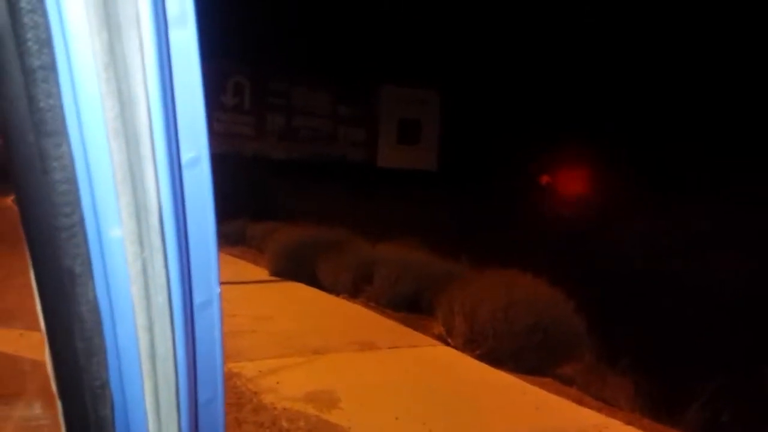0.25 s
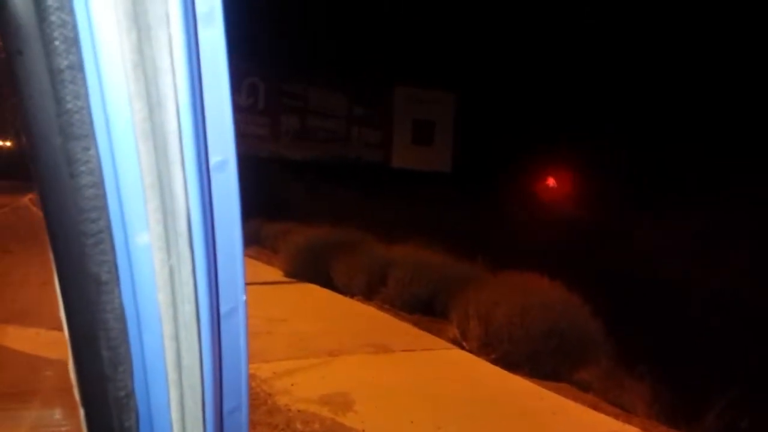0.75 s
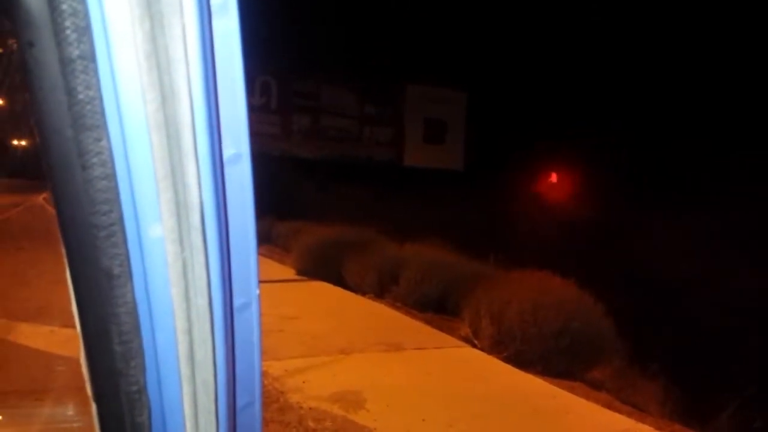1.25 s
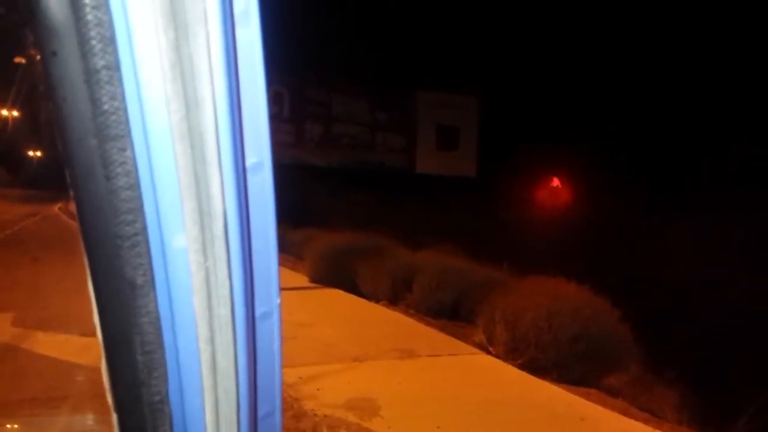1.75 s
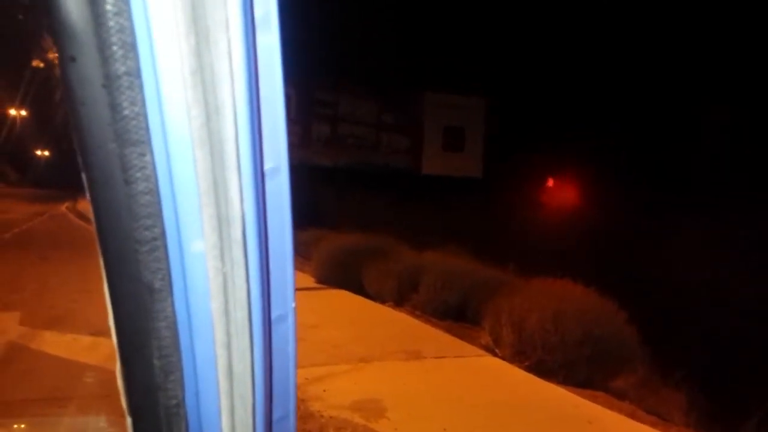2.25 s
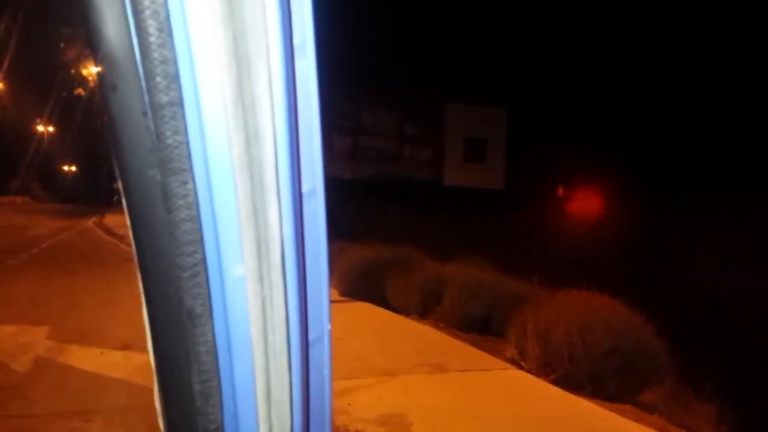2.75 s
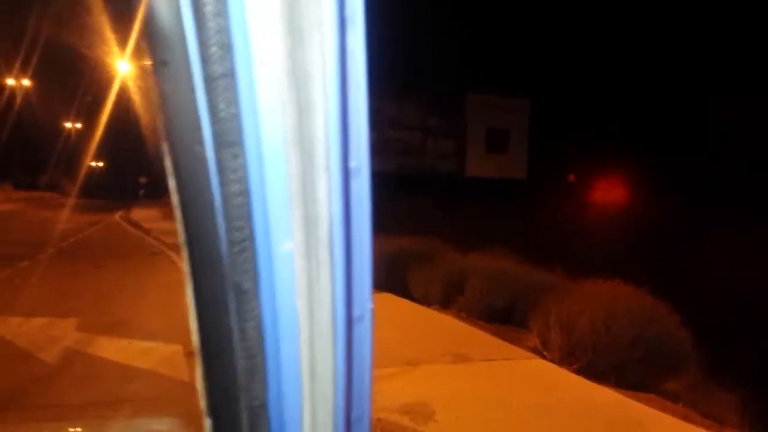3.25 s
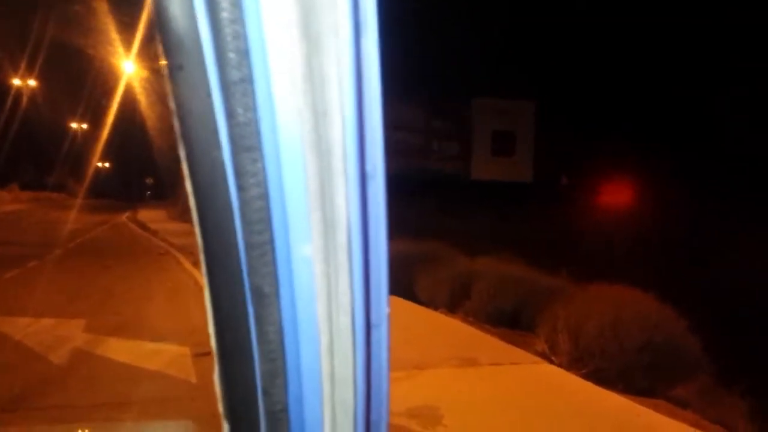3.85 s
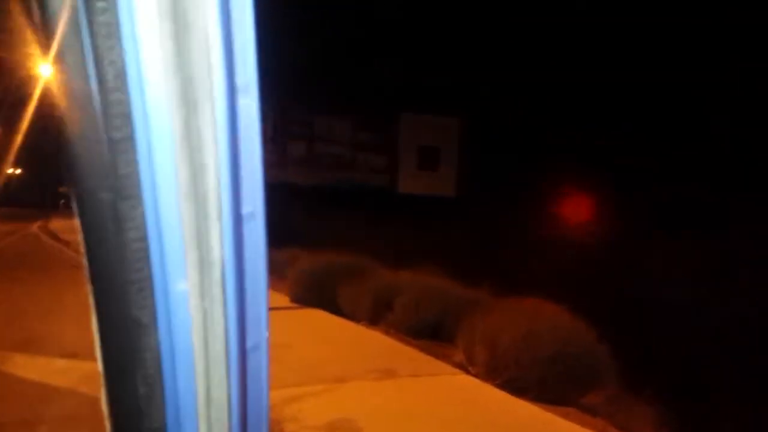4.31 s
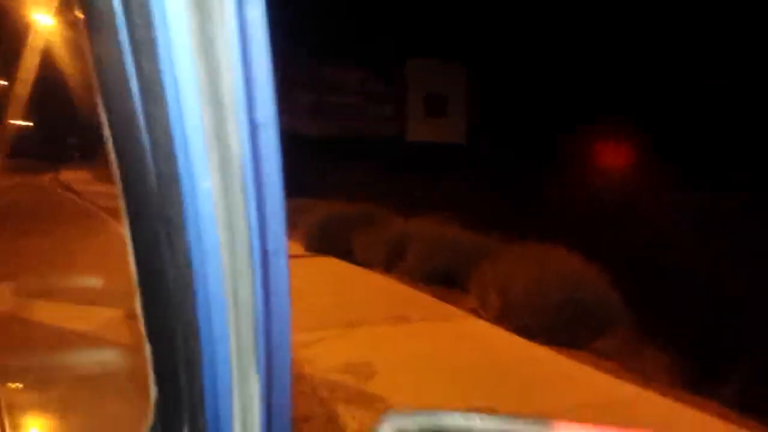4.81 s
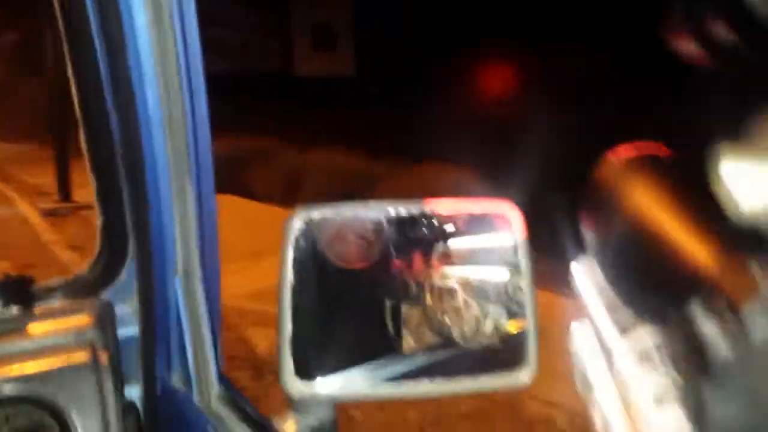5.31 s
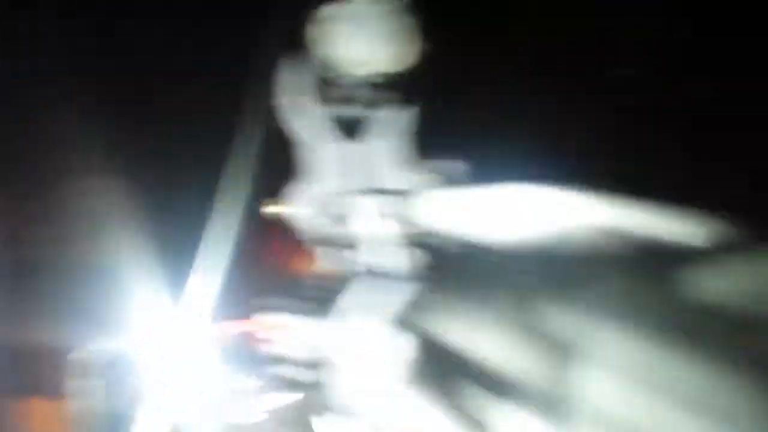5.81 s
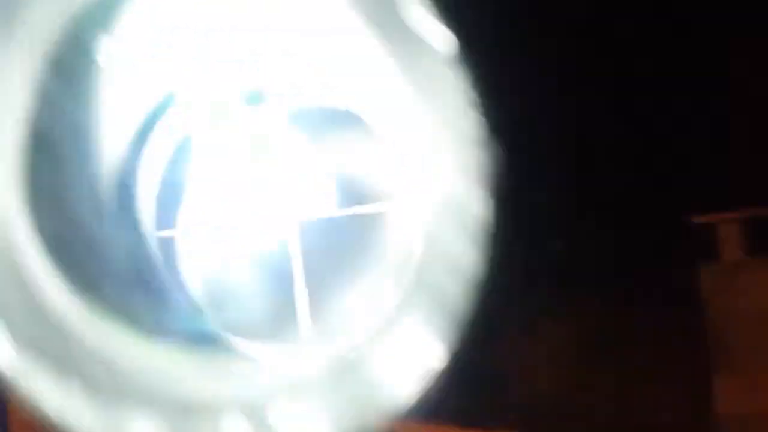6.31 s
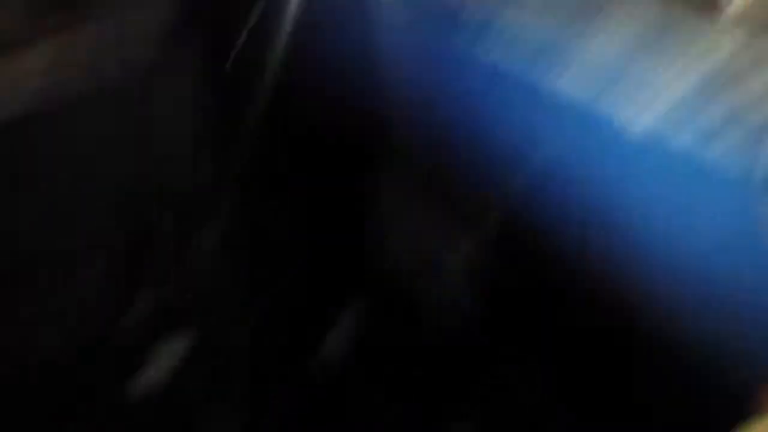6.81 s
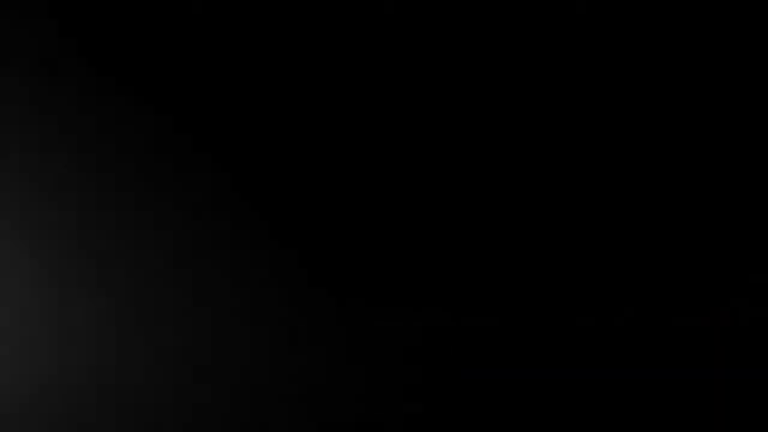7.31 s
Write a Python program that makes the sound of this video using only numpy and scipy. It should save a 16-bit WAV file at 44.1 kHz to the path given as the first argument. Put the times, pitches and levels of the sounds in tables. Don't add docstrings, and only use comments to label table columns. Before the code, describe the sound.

A turn-signal relay ticks steadily, click and clack, inside a quiet parked vehicle, with faint engine drone, handling rustle and sharp plastic snaps at the end.

```python
import sys
import numpy as np
from scipy import signal
from scipy.fft import rfft, irfft
from scipy.io import wavfile
from scipy.ndimage import uniform_filter1d

SR = 44100
rng = np.random.default_rng(int(sys.argv[2]) if len(sys.argv) > 2 else 0)


def to_wav(s):
    ch = np.atleast_2d(s).T
    pcm = np.round(np.clip(ch, -1, 1) * 32767)
    wavfile.write(sys.argv[1], SR, pcm.astype(np.int16))


def linear_from_db(decibels):
    return 10 ** (np.asarray(decibels, float) / 20)


N = 333345

# frequency in Hz, density in dB per Hz.
HISS_COLOUR = [(880, -52), (1500, -7), (2200, -12), (5240, -4), (6190, -4.5), (7380, -5.5), (13900, -7.5),
               (14800, -14), (15500, -37)]

# time in seconds, pitch in Hz.
ENGINE_PITCH = [(0.0, 103.9), (0.7, 106), (1.25, 114), (2.6, 125.5), (3.75, 132.8), (4.1, 138.7),
                (4.5, 139.8), (4.7, 131.3), (4.92, 149.6)]
# start in seconds,
# length in seconds, level in dB rms.
DRONE_SWELLS = [(.2, 0.18, -75), (.53, 0.13, -60.5), (.74, .58, -65.5), (1.5, 0.24, -67),
                (2.11, .35, -69.5), (2.5, 0.36, -66.5), (3.11, 0.21, -64.5), (3.36, 0.47, -59.5),
                (3.86, 0.24, -65), (4.07, 0.13, -55), (4.18, 0.15, -48.5), (4.33, 0.29, -54.5),
                (4.51, 0.12, -38), (4.79, 0.11, -56), (4.9, .12, -54)]
# time in seconds, pitch in Hz, level in dB rms.
WHINE = [(1.2, 262, -81), (1.4, 267.7, -75), (2.0, 277.6, -83.5), (2.4, 284, -74), (2.8, 288.2, -76.5),
         (3.0, 292.5, -92)]

# time in seconds, rub level in dB.
GRIP = [(0, -82), (.16, -73.5), (.3, -79.5), (.61, -69.5), (.8, -78), (1.58, -71.5), (1.9, -80),
        (3.15, -78.5), (3.9, -74), (4.25, -67), (4.58, -64.5), (4.72, -78.5), (5.55, -65.5), (5.95, -71.5),
        (6.15, -73), (6.92, -52), (7.2, -69), (7.56, -76)]
# start in seconds, length in seconds, level in dB rms.
JOLTS = [
    (.55, 0.24, -65),
    (4.05, 0.13, -60),
    (4.5, 0.18, -46.5),
    (4.72, 0.19, -59.5),
    (5.04, 0.092, -57),
    (5.72, 0.055, -49),
    (5.85, 0.11, -59),
    (7.03, 0.098, -58),
]
# start in seconds, length in seconds, level in dB rms, left minus right in dB.
STROKES = [(0.025, 0.45, -78, 10), (0.475, 0.25, -68.5, 4.5), (0.986, 0.39, -69, 7), (1.234, 0.49, -71, 7),
           (3.203, 0.29, -78, 3), (3.91, .08, -56.5, 3), (4.053, 0.658, -67.5, 3.5),
           (4.701, 0.49, -73, 0.5), (5.091, .48, -67.5, 9), (5.56, 0.53, -69, 5.5), (6.17, 0.34, -59, 1.5),
           (6.383, 0.72, -53, 3.5), (7.043, 0.17, -63, 7), (7.187, 0.34, -66, 16), (7.277, 0.17, -51, 2),
           (7.39, 0.21, -51, 2)]
# frequency in Hz, density in dB per Hz.
RUMBLE_COLOUR = [(15, -6), (40, 0), (70, 4), (110, 4.5), (160, 2.5), (250, -70)]
CREAK_COLOUR = [(70, -16), (110, 3.5), (220, 1.5), (340, -5), (520, -7.5), (800, -35)]
RUB_COLOUR = [(300, -1.5), (550, 0), (850, 1.5), (1350, -1.5), (1900, -6), (2600, -7), (3600, -15.5)]
RUSTLE_COLOUR = [(1180, -38), (2000, -10.5), (2470, -9), (3430, -4.5), (3860, -4), (6350, 2), (7390, -2),
                 (8170, -1.5), (9360, -7.5), (11500, -11), (13100, -13), (14300, -24), (15000, -25)]

# start in seconds, length in seconds, centre in Hz, width in Hz, level in dB rms.
SQUEAKS = [
    (2.25, 0.99, 1440, 200, -80.5),
    (0.092, 0.34, 1380, 200, -76),
    (4.218, 0.22, 1460, 140, -65),
    (4.193, 0.12, 4700, 270, -64),
    (4.764, 0.24, 284, 140, -57.5),
    (6.5, 0.82, 2550, 450, -62.5),
    (6.751, 0.45, 1440, 160, -58),
    (6.802, 0.54, 840, 150, -60.5),
    (7.117, 0.06, 810, 100, -61),
]
# start in seconds, peak in dB, centre in Hz, decay to -60 dB in seconds,
# dry tick in dB relative to the peak.
BUMPS = [(0.073, -53, 2020, 0.14, 0), (0.18, -58, 1380, .03, 4.5), (0.259, -58, 315, 0.22, 6.5),
         (0.589, -49, 136, 1, -25), (.66, -55, 122, 0.16, -25), (0.87, -53.5, 145, 0.13, -8),
         (1.28, -63.5, 300, 0.065, 16.5), (1.53, -54, 120, 0.22, -30), (1.69, -53, 676, 0.073, -11),
         (3.24, -61.5, 696, 0.16, 2), (3.387, -50, 630, 0.17, -8), (3.79, -54.5, 395, 0.12, -7),
         (3.933, -56.5, 500, 0.2, 10), (4.058, -49.5, 214, 0.12, -8), (4.186, -49, 785, 0.27, 10),
         (4.438, -52, 900, .08, 10), (4.508, -38, 186, 0.39, -26), (4.59, -46.5, 151, 0.35, -34),
         (4.773, -54.5, 285, 0.11, -21), (5.466, -54.5, 141, .2, 12), (5.569, -39, 198, 0.12, -13),
         (5.813, -51, 7000, 0.0078, 2), (7.025, -40, 4000, 0.0096, -5)]

SNAP_TIMES = [7.0328, 7.0355, 7.0599, 7.1983, 7.3283, 7.3330, 7.3345]
# left level in dB, right level in dB, the snap's own mode in Hz, blunt push in dB, decay
# to -60 dB in seconds.
SNAPS = [
    (-11.5, -19.5, 3980, -43, 0.0032),
    (-33, -27, 3600, -40, 0.011),
    (4.5, -8.5, 2290, -26, 0.0032),
    (-0.5, -32, 1330, -64, 0.0027),
    (-23.5, -21, 2400, -24, 0.001),
    (-31, -23.5, 5100, -14, 0.002),
    (-47, -17.5, 4300, -33, 0.0055),
]
# frequency in Hz, level in dB.
SNAP_MODES = [(3800, 0), (5300, 0.5), (6450, 3.5), (7600, 0), (8500, -3), (11000, -7.5), (12500, -8),
              (14200, -11.5)]

# peak in dB, left minus right in dB.
MAKE_CLICKS = [(-28, 1), (-26, 4), (-28, 3.5), (-25, 2), (-26.5, 4), (-24, 3), (-23, 2.5), (-24.5, 4),
               (-28, 1.5), (-18.5, -0.5), (-32.5, 4)]
BREAK_CLICKS = [(-32.5, 2.3), (-29.5, 5.5), (-30, 2.4), (-31.5, 3.5), (-31, 2.5), (-28, 3.5), (-26, 2.3),
                (-30, 2.2), (-29, 0.98), (-27.5, 2), (-39, 4.8)]
# frequency in Hz, level in dB, decay to -60 dB in seconds.
MAKE_MODES = [(1614, -14, 0.18), (2000, -29, 0.14), (2176, -9.5, 0.1), (2990, -10, 0.28),
              (2976, -7.5, 0.11), (3826, 5, 0.13), (3970, -43, 0.082), (4500, 7, 0.13), (5400, -8, 0.053),
              (5790, -6, 0.028), (6660, -9, 0.09), (7240, -20, 0.045), (8100, -27, 0.05), (8440, 7, 0.036)]
BREAK_MODES = [(1345, -19, 0.29), (2186, -13.5, 0.18), (3100, 3, 0.14), (3940, -32, 0.11),
               (4300, -8.5, 0.26), (5600, -20, 0.1), (5300, -13, 0.091), (6450, -20, 0.12), (7000, 6, 0.1),
               (7740, -29, 0.022), (7500, -3, 0.066), (7900, -1, 0.14)]
# frequency in Hz, density in dB per Hz.
MAKE_SCATTER = [(530, -20), (900, -32.5), (1860, -10), (2280, -25.5), (2860, -2.5), (3380, -11), (4490, -5),
                (5120, -7.5), (8750, -9.5), (11900, -21), (13800, -15.5), (14600, -17.5), (15500, -63)]
BREAK_SCATTER = [(530, -18.5), (900, -20), (1370, -10.5), (2150, -8), (3000, -9), (3630, -14), (4440, -7),
                 (4820, -7), (6730, -2.5), (8550, -15), (13900, -19), (14600, -25), (15500, -77)]
# frequency in Hz, level in dB, decay to -60 dB in seconds.
DASH_MODES = [(212.2, -6.5, 0.39), (278.6, -17, 0.48), (357.7, 1.5, 0.13), (477, -2, 0.18),
              (566.4, -3.5, 0.15)]


def track(table, column):
    rows = np.array(table, float)
    return np.interp(np.arange(N) / SR, rows[:, 0], rows[:, column])


def on_log(points, hz):
    points = np.array(points, float)
    return np.interp(np.log(hz + 1), np.log(points[:, 0]), points[:, 1])


def colour(x, points):
    size = x.shape[-1]
    gain = linear_from_db(on_log(points, np.fft.rfftfreq(size, 1 / SR)))
    y = irfft(rfft(x) * gain, size)
    return y / np.sqrt(np.mean(y ** 2, axis=-1, keepdims=True))


def alike(share, size):
    a, b = rng.standard_normal((2, size))
    share = np.clip(share, 0, 1)
    return np.array([a, np.sqrt(share) * a + np.sqrt(1 - share) * b])


def flicker(rate_hz, depth_db):
    hold = int(SR / rate_hz)
    steps = np.repeat(rng.standard_normal(N // hold + 1), hold)
    return linear_from_db(depth_db * uniform_filter1d(steps, hold)[:N])


def swells(rows, edge_s, rest_db):
    t = np.arange(N) / SR
    power = linear_from_db(rest_db) ** 2
    for s, length, db in rows:
        edge = np.clip(np.minimum(t - s, s + length - t) / edge_s, 0, 1)
        power = power + (linear_from_db(db) * np.sin(np.pi / 2 * edge) ** 2) ** 2
    return np.sqrt(power)


def ring(modes, size, scatter_db, turn, detune=0.):
    t = np.arange(size) / SR
    hz, db, t60 = np.transpose(sorted(modes))[:, :, None]
    chance = rng.standard_normal((3, 2, len(modes), 1))
    sign = (-1.) ** np.arange(len(modes))[:, None]
    phase = 2 * np.pi * hz * (1 + detune * chance[2]) * t + turn * chance[1]
    decay = linear_from_db(db + scatter_db * chance[0] - 60 * t / t60)
    return np.sum(sign * decay * np.sin(phase), axis=1)


def add(out, s, sound):
    i = max(int(s * SR), 0)
    out[:, i:i + sound.shape[1]] += sound[:, :N - i]


def peak1(x):
    return x / np.abs(x).max(axis=-1, keepdims=True)


def ports(x):
    left_minus_right_db = 0.55
    return x * linear_from_db([[left_minus_right_db / 2], [-left_minus_right_db / 2]])


def hiss():
    return linear_from_db(-76) * colour(alike(0.011, N), HISS_COLOUR)


def engine_tone(pitch, gain, end_s):
    fade = np.clip((end_s - np.arange(N) / SR) / 0.037, 0, 1)
    hz = track(pitch, 1) * flicker(30, 0.16)
    return fade * gain * linear_from_db(2.0) * flicker(28, 2.1) * np.sin(2 * np.pi * np.cumsum(hz) / SR)


def engine():
    drone = engine_tone(ENGINE_PITCH, swells(DRONE_SWELLS, edge_s=0.048, rest_db=-73), end_s=5.0)
    whine = engine_tone(WHINE, linear_from_db(track(WHINE, 2)), end_s=WHINE[-1][0])
    return ports(np.array([drone + whine, drone + whine]))


def sleeve():
    grains = alike(0.045, N) * linear_from_db(3.2 * np.minimum(rng.exponential(size=N), 6))
    edge_s, rest_db, rest_pan_db = 0.11, -84, -8
    gains = []
    for side in (1, -1):
        rows = [(s, length, db + side * pan_db / 2) for s, length, db, pan_db in STROKES]
        gains.append(swells(rows, edge_s, rest_db + side * rest_pan_db / 2))
    return linear_from_db(2.5) * np.array(gains) * flicker(18, 1.1) * colour(grains, RUSTLE_COLOUR)


def hand():
    grip_db = track(GRIP, 1)
    effort_db = np.minimum(grip_db, -67) + 72
    rumble_db = -73.5 + 0.38 * effort_db
    creak_db = -70 + effort_db
    rumble = swells(JOLTS, 0.085, rumble_db) * flicker(9.2, 2.1) * colour(alike(0.54, N), RUMBLE_COLOUR)
    creak = linear_from_db(creak_db + 3) * flicker(22, 3.6) * colour(alike(0.67, N), CREAK_COLOUR)
    rub = linear_from_db(grip_db + 5.0) * flicker(30, 2.4) * colour(alike(0.05, N), RUB_COLOUR)
    return ports(rumble + creak + rub)


def squeaks():
    out, size = np.zeros((2, N)), 32768
    t = np.arange(size) / SR
    for s, length, hz, width_hz, db in SQUEAKS:
        shape = [(hz - 2 * width_hz, -40), (hz - width_hz / 2, -3), (hz, 0),
                 (hz + width_hz / 2, -3), (hz + 2 * width_hz, -40)]
        band = colour(alike(0.45, size), shape)
        add(out, s, linear_from_db(db) * band * np.sin(np.pi * np.clip(t / length, 0, 1) ** 0.5))
    return out


def bumps():
    out, size = np.zeros((2, N)), 8192
    t = np.arange(size) / SR
    for s, db, hz, t60, tick_db in BUMPS:
        shape = [(hz / 4, -24), (hz / 1.9, -4), (hz, 0), (2.18 * hz, -10), (12 * hz, -35), (60 * hz, -65)]
        dull = colour(alike(0.9, size), shape)
        body = peak1(dull * np.clip(t / 0.0053, 0, 1) * linear_from_db(-60 * t / t60))
        tick = peak1(colour(alike(0.06, size), RUSTLE_COLOUR) * linear_from_db(-60 * t / 0.045))
        add(out, s - .002, linear_from_db(db + 2.5) * (body + linear_from_db(tick_db) * tick))
    return out


def snaps():
    out, n = np.zeros((2, N)), np.arange(1024)
    for s, (left_db, right_db, low_hz, push_db, t60) in zip(SNAP_TIMES, SNAPS):
        modes = [(low_hz, -6.5, 1.7 * t60)] + [(hz, db, t60) for hz, db in SNAP_MODES]
        crack = peak1(ring(modes, len(n), .6, turn=.1))
        snap = crack + linear_from_db(push_db) * n / 4 * np.exp(-n / 8)
        late = np.roll(snap[1], int(1.4 * max(left_db - right_db - 9.0, 0)))
        add(out, s, linear_from_db([[left_db], [right_db]]) * np.array([snap[0], late]))
    return out


def thump():
    start_s, push_s, rebound_s = 7.3347, .00075, .0024
    t = np.arange(N) / SR - start_s
    late = np.clip(t - 1.15 * push_s, 0, None)
    back = (1 - np.exp(-late / .0006)) * (np.exp(-late / rebound_s) - .24 * np.exp(-late / .008))
    right = np.exp(-(t / push_s) ** 2) - 1.25 * back
    left = -np.sin(2 * np.pi * 150 * late) * np.exp(-late / 0.0062)
    return np.array([linear_from_db(-27) * 0.83 * left, linear_from_db(-14) * right])


def relay(first_s, clicks, modes, scatter, rise_s, hold_s, t60, modes_db, thud_db, repeat):
    period_s, right_lag = .7089, 14
    out, size = np.zeros((2, N)), 6144
    t = np.arange(size) / SR
    rise = np.clip(t / rise_s, 0, 1) ** 1.5
    swell = rise * linear_from_db(-60 * np.clip(t - rise_s - hold_s, 0, None) / t60)
    usual = alike(0.2, size)
    for k, (db, pan_db) in enumerate(clicks):
        fresh = alike(0.19, size)
        noise = repeat * usual + np.sqrt(1 - np.clip(repeat, 0, 1) ** 2) * fresh
        cabin = peak1(colour(noise, scatter) * swell)
        rings = peak1(ring(modes + modes, size, 1.9, turn=1.85, detune=0.0171) * rise * linear_from_db(-250 * t))
        thud = peak1(ring(DASH_MODES, size, 0.63, turn=0.83, detune=0.014)) * np.clip(t / 0.0054, 0, 1)
        tick = (cabin + linear_from_db(modes_db) * rings) * linear_from_db(np.array([[pan_db], [-pan_db]]) / 2)
        tick[1] = np.roll(tick[1], right_lag)
        add(out, first_s + k * period_s - .003, linear_from_db(db) * (1.022 * tick + linear_from_db(thud_db) * thud))
    return out


def scene():
    handling = hand() + sleeve() + squeaks() + bumps() + snaps() + thump()
    closing = relay(.4513, MAKE_CLICKS, MAKE_MODES, MAKE_SCATTER, rise_s=0.0049, hold_s=0.0028,
                    t60=0.072, modes_db=-5.5, thud_db=-22.5, repeat=0.53)
    opening = relay(.0937, BREAK_CLICKS, BREAK_MODES, BREAK_SCATTER, rise_s=0.0038, hold_s=0.006,
                    t60=0.07, modes_db=-5, thud_db=-14.0, repeat=0.74)
    return hiss() + engine() + handling + closing + opening


def low_pass(x):
    return signal.sosfilt(signal.butter(12, 16030, fs=SR, output="sos"), x)


def record(dry):
    above = np.clip((np.fft.rfftfreq(N, 1 / SR) - 14550) / 300, 0, 1)
    narrow = irfft(rfft(dry) * linear_from_db(-32 * above), N)
    mix = np.clip(narrow, -1, 1)
    return low_pass(mix)


dry = scene()
out = record(dry)
to_wav(out)
```